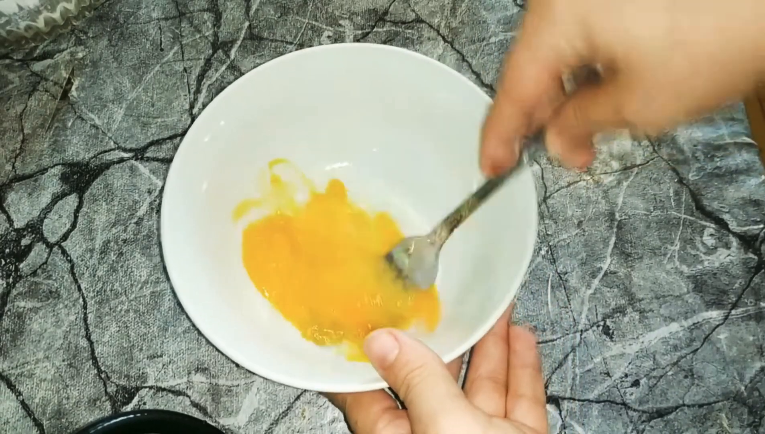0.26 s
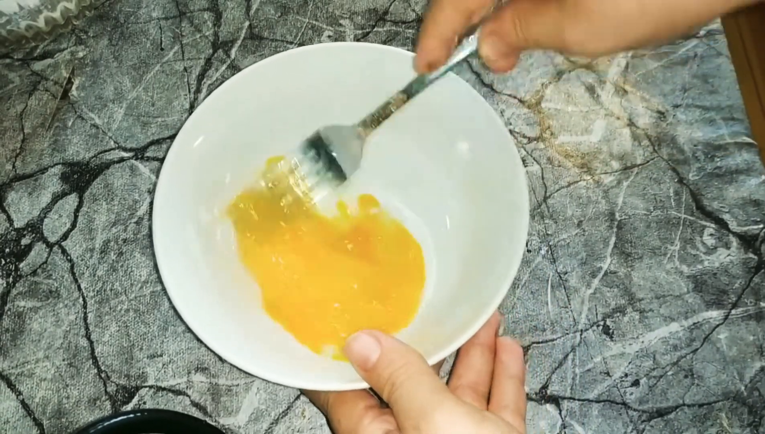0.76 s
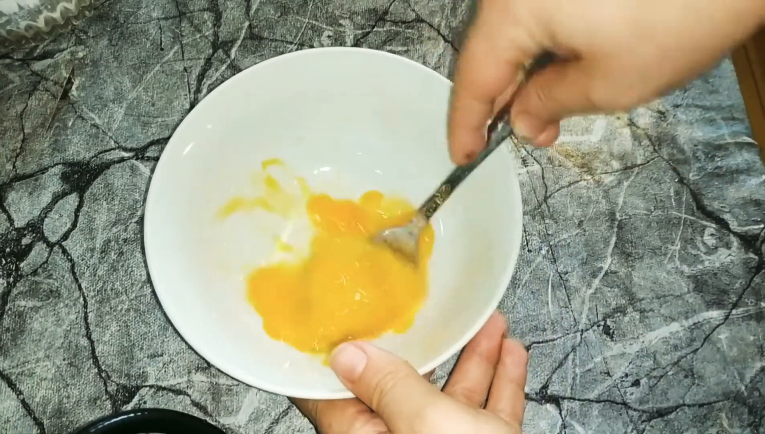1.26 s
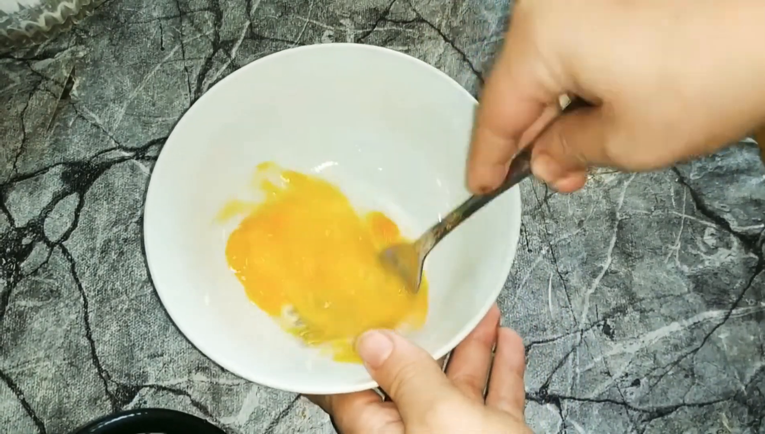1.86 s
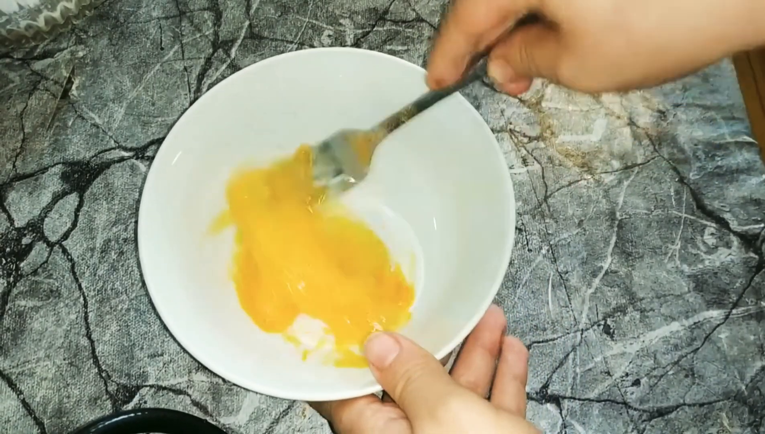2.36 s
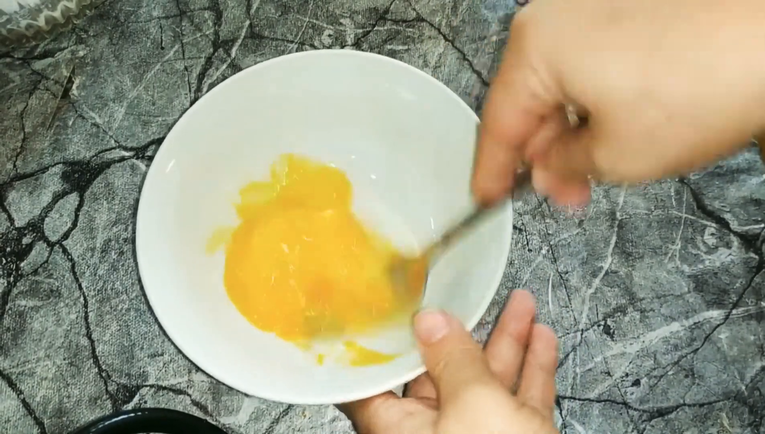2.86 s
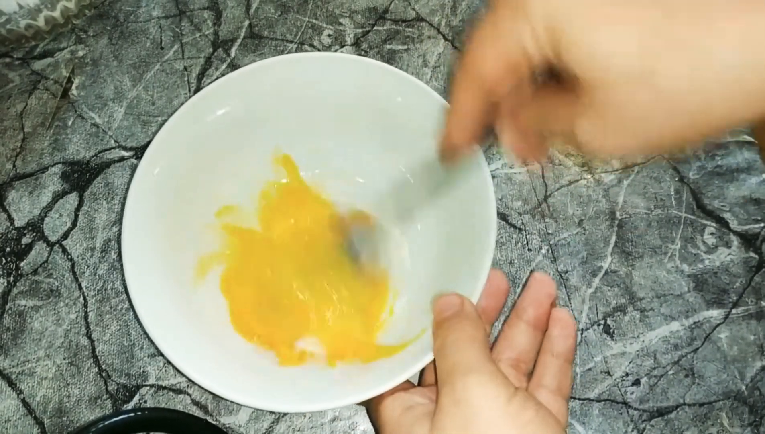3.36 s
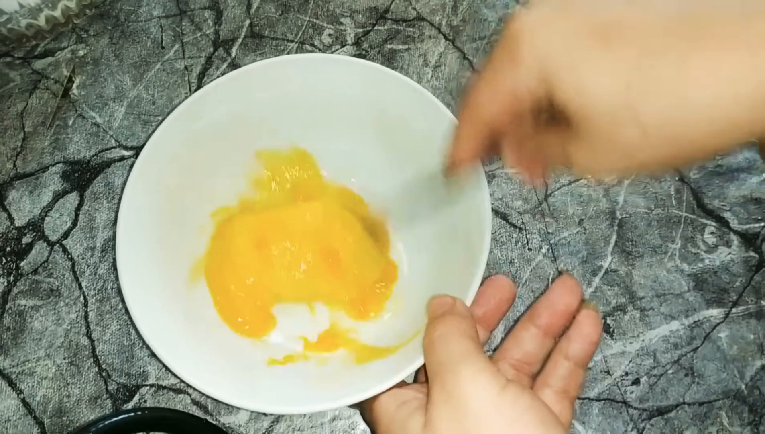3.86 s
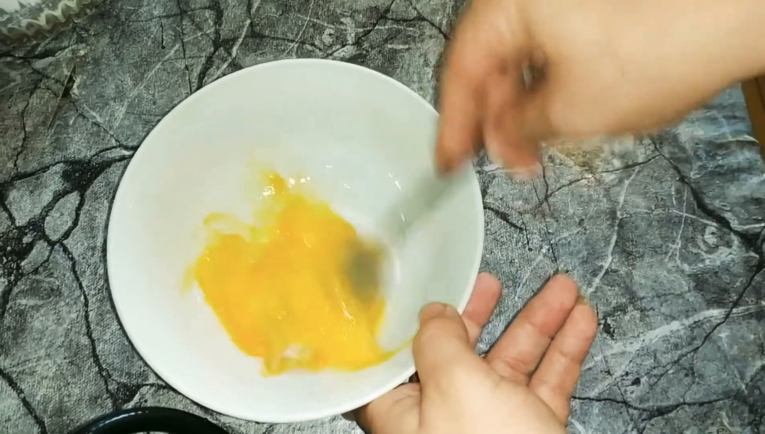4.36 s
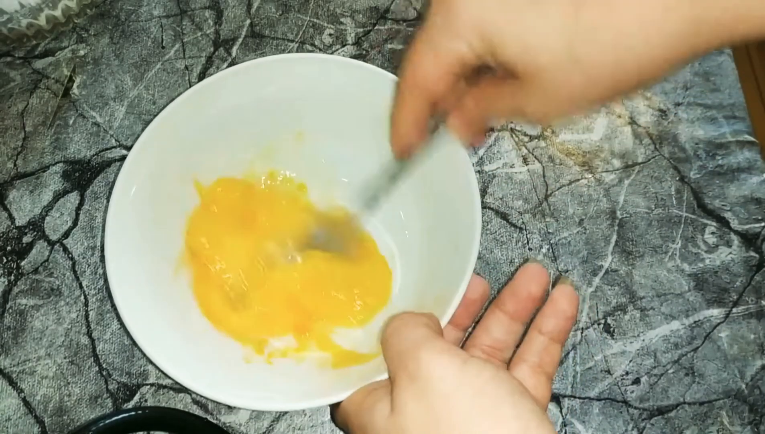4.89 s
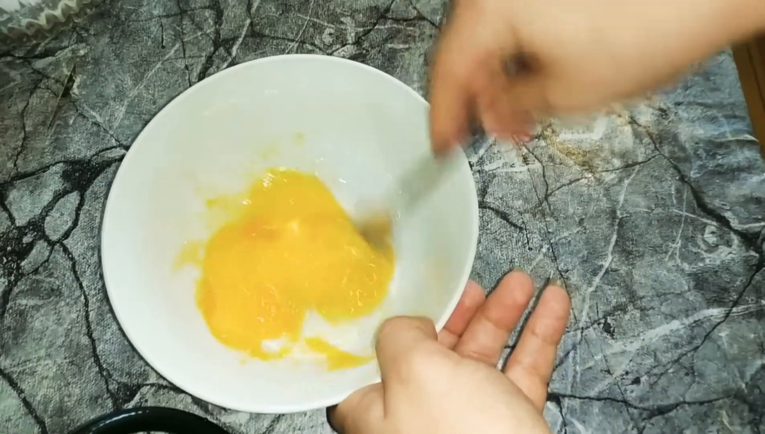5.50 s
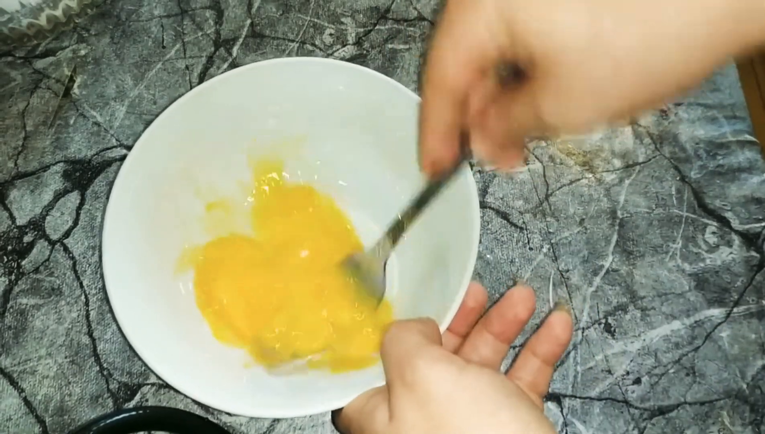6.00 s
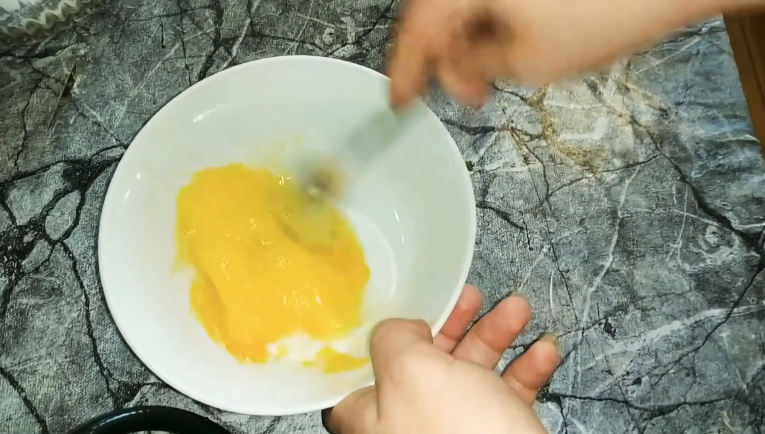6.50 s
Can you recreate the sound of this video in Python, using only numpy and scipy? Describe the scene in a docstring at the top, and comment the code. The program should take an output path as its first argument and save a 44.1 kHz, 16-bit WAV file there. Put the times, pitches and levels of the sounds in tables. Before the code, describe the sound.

Close up in a small hard-walled kitchen, a metal fork beats raw egg in a ceramic bowl at about five strokes a second. Each stroke is a bright rasping click followed by a short, crackling wet swish. Small plops and low glugs fill the gaps. Later strokes press harder, with clearer metallic ringing and dull bumps of the bowl on the counter. Quiet room air sits beneath.

```python
"""Fork tines click on a glazed bowl and drag a wet, crackling swish through raw egg, five strokes a second.
Clicks are shaped noise rasps; the swish is noise driven by random bursts; air plops, glugs and bowl
knocks are pulses in damped resonances. Hard strokes ring the fork's modes and bump the bowl on the counter.
A kitchen echo and quiet air surround it; a close pair of microphones hears most lows in opposite phase."""
import sys
import numpy as np
from scipy import signal
from scipy.fft import rfft, irfft
from scipy.io import wavfile
from scipy.ndimage import uniform_filter1d

SR = 44100
rng = np.random.default_rng(int(sys.argv[2]) if len(sys.argv) > 2 else 0)


def int16_out(signal):
    """Quantize to a 16-bit WAV file."""
    q = np.round(np.clip(np.atleast_2d(signal).T, -1, 1) * 32767)
    wavfile.write(sys.argv[1], SR, q.astype(np.int16))


N = 297234
TIME = np.arange(N) / SR
EDGE_HZ = 16150

# Quiet air, spectral density: [f/Hz, level/dB per Hz]
AIR_COLOUR = [(25, -25), (85, -29), (150, -1), (220, 4), (400, 2.5), (700, -4), (1200, 0), (1900, -5.5),
              (4000, -6.5), (9000, -13.5), (16000, -14.5)]
# Kitchen decay: [f/Hz, t60/s]
KITCHEN_DECAY = [(150, 0.13), (500, 0.21), (1200, 0.49), (4000, 0.23), (9000, 0.15), (16000, 0.016)]
# Stereo difference: [f/Hz, side minus mid/dB]
WIDTH = [(40, 10), (110, -1.5), (250, 13.5), (600, -2.5), (1100, 4), (2200, 1), (4400, 0), (15000, 0.5)]
# Depth of random shifting colour in swish, clicks and echo: [f/Hz, depth/dB]
SHIFT_DEPTH = [(300, 2.5), (2000, 4.5), (6000, 4), (12000, 6)]

# Modes of the bowl on the counter: [f/Hz, level/dB, t60/s]
COUNTER_MODES = [(169, -2, .4), (237, 7, .28), (272, 4, .15), (335, 1, .15), (448, -5, .2), (488, -3, .2),
                 (636, -3, .18)]
# Modes of the bowl's wall: [f/Hz, level/dB, t60/s]
BOWL_MODES = [(1212, -1, 0.32), (2920, -8, 0.13)]
# Resonances of the fork pressed on the bowl: [f/Hz, width/Hz, level/dB]
FORK_MODES = [(1300, 300, -8), (1700, 300, -4), (2280, 200, -5), (3050, 280, -3), (3820, 200, -2),
              (4750, 350, 0), (5450, 350, -1), (5760, 220, 1), (6350, 300, -13), (6950, 350, -7),
              (7920, 260, -3), (8900, 350, -6), (10400, 350, -5), (11200, 400, -11), (13550, 500, -9),
              (14550, 350, -7), (15400, 300, -10)]

# Spectral densities of the noise layers: [f/Hz, level/dB per Hz]
BUMP_COLOUR = [(30, -47), (100, -52), (170, -3), (290, -26), (480, -1.5), (700, -7.5), (1500, -36),
               (4000, -62)]
SLOSH_COLOUR = [(30, -26), (85, -51), (130, -9), (175, 8.5), (250, 16), (330, 2), (430, -7), (700, -44),
                (1500, -21)]
GURGLE_COLOUR = [(300, -15), (750, -4.5), (1020, 4.5), (1300, 2), (1650, 2), (2100, 4), (3500, -3)]
SWISH_COLOUR = [(500, -13), (1200, -23.5), (2200, -26), (2700, -0.5), (3150, 2), (3450, 4), (4300, 5.5),
                (6200, 1.5), (8200, 3.5), (11000, 2), (14000, 4), (16000, -18)]
CLICK_COLOUR = [(60, -71), (200, -7), (700, -16.5), (1200, -8.5), (2200, 2.5), (3800, 5), (4600, 8),
                (5050, 0), (5650, 5.5), (6400, 5.5), (7600, 4), (11000, 2), (16000, -4.5)]

# Event levels are relative: each layer adds its own offset.
# Fork rubs free of the wall and lets it sing: [t/s, level/dB]
SONGS = [(0.479, -45), (0.661, -41), (0.862, -38.5), (1.67, -46.5), (1.801, -54), (1.867, -35.5),
         (2.01, -40), (2.079, -39), (2.227, -41), (2.479, -35.5), (3.859, -44), (4.078, -38.5),
         (4.939, -40), (5.552, -43.5), (5.736, -47), (5.873, -34.5), (6.352, -40)]
# Hardest knocks of the bowl on the counter: [t/s, level/dB, judder decay/s]
BUMPS = [(2.388, -28.5, 0.023), (4.019, -28, 0.05), (4.051, -28.5, 0.043), (4.083, -32, 0.035),
         (4.279, -37, 0.0089), (4.413, -28, 0.083), (4.476, -55, 0.018), (4.9, -35.5, 0.01),
         (5.267, -23, 0.032), (5.306, -26.5, 0.03), (5.662, -32, 0.11), (5.718, -19.5, 0.034),
         (5.753, -37, 0.02), (5.873, -34, 0.023)]
# Mass of egg folds over: [t/s, level/dB, f/Hz]
GLUGS = [(0.189, -35, 300), (0.241, -37, 230), (0.433, -42, 270), (0.608, -50, 260), (1.037, -44, 288),
         (1.201, -46, 270), (1.4, -35, 280), (1.998, -47, 280), (2.043, -31, 230), (2.204, -47, 290),
         (2.609, -33, 288), (3.062, -34, 290), (3.213, -45, 290), (3.263, -37, 240), (3.422, -41, 290),
         (3.458, -47, 280), (3.618, -35, 280), (3.674, -36, 230), (3.836, -32, 280), (3.882, -39, 290),
         (4.238, -38, 280), (4.676, -40, 300), (4.702, -43, 290), (5.092, -37, 280), (5.123, -39, 240),
         (6.14, -39, 290), (6.322, -32, 290), (6.536, -33, 310)]
# Blobs of egg drop back as the fork swings round: [t/s, level/dB, blobs in a row]
GLOOPS = [(0.103, -44.5, 1), (0.17, -44.5, 1), (0.813, -36.5, 1), (1.1, -44, 2), (2.098, -38, 1),
          (2.559, -41.5, 2), (2.698, -44.5, 2), (3.065, -45, 2), (3.339, -41, 2), (3.561, -41, 2),
          (3.979, -42.5, 1), (4.594, -41.5, 3), (5.561, -45.5, 2), (6.062, -43, 2)]
# Egg slaps shut on pockets of air: [t/s, level/dB, f/Hz]
PLOPS = [(0.188, -34, 1200), (0.388, -23, 1060), (0.426, -35, 1130), (0.58, -28.5, 1195),
         (0.602, -35, 1160), (0.626, -26, 1290), (0.682, -26, 1210), (0.736, -31, 1320), (0.784, -25, 1140),
         (0.81, -23.5, 1200), (0.865, -29, 1180), (0.88, -31.0, 1180), (1.002, -38, 1230),
         (1.076, -33, 1310), (1.199, -34, 1330), (1.23, -27.5, 1460), (1.255, -32, 1240), (1.28, -26, 1270),
         (1.384, -34.0, 1180), (1.44, -33.5, 1230), (1.538, -37, 1190), (1.579, -28, 1270),
         (1.604, -32, 1250), (1.784, -27, 1160), (1.833, -28, 1350), (1.995, -37, 1290), (2.012, -37, 1320),
         (2.029, -36, 1200), (2.189, -20, 1140), (2.234, -28, 1110), (2.373, -21.5, 1070),
         (2.438, -31, 1210), (2.598, -16.5, 1040), (2.989, -32, 1240), (3.064, -34, 1270),
         (3.164, -41.5, 1060), (3.21, -44, 1190), (3.26, -34.5, 1260), (3.409, -34.5, 1180),
         (3.451, -38, 1240), (3.468, -29, 1400), (3.568, -35, 1380), (3.609, -26, 1230), (3.653, -39, 1310),
         (3.825, -30, 1040), (3.862, -27.5, 1230), (3.887, -32.5, 1020), (4.012, -17, 1270),
         (4.051, -37, 1450), (4.077, -42, 1360), (4.233, -36, 1390), (4.256, -20.5, 1480),
         (4.413, -17.5, 1060), (4.469, -29, 1040), (4.581, -25, 1090), (4.673, -36, 1110),
         (4.873, -46, 1300), (4.898, -28.5, 1280), (4.937, -25, 1160), (5.071, -35.0, 1160),
         (5.103, -30, 1210), (5.163, -30, 1200), (5.267, -19.5, 1200), (5.659, -23.5, 1400),
         (5.881, -42, 1240), (5.94, -39, 1070), (6.052, -33, 1090), (6.095, -26, 1070),
         (6.112, -33.5, 1280), (6.325, -23.5, 1120), (6.35, -22.5, 1250), (6.499, -16, 1130)]
# Threads of egg snap between strokes: [t/s, level/dB, f/Hz]
SNAPS = [(0.363, -47, 2540), (0.37, -33.5, 2950), (0.732, -39, 2220), (0.999, -47, 2240),
         (1.093, -56, 12750), (1.37, -33.5, 2970), (1.538, -44, 2220), (1.672, -41, 2930),
         (1.933, -51, 3140), (2.968, -46, 2210), (3.163, -40, 2240), (3.566, -44.5, 2240),
         (3.788, -48, 2240), (4.732, -41, 4580), (4.807, -48, 2240), (5.156, -38, 5370), (6.049, -45, 4050),
         (6.387, -46, 3700)]
# Tines skip on the glaze during a drag; the rows at 2240 Hz are wet pops of egg: [t/s, level/dB, clink f/Hz]
SKIPS = [(0.015, -33, 8400), (0.035, -30, 12300), (0.221, -25, 8900), (0.416, -26.5, 9500),
         (0.588, -32, 2370), (0.617, -28.5, 3960), (0.679, -49, 2240), (0.826, -26, 8600),
         (1.226, -32, 2250), (1.623, -30.5, 8700), (1.635, -27.5, 3160), (2.228, -28, 11700),
         (2.421, -26, 4690), (2.435, -32, 8480), (2.623, -35, 8800), (2.797, -27, 4130), (2.841, -34, 4310),
         (2.999, -52, 3320), (3.241, -29.5, 3490), (3.259, -33, 10500), (3.43, -35, 7550),
         (3.451, -24, 7700), (3.653, -27, 6200), (3.669, -26.5, 9600), (3.861, -35, 2240),
         (3.879, -28.5, 3700), (4.232, -24.5, 3490), (4.26, -27.5, 2240), (4.276, -23.5, 10400),
         (4.461, -25, 10900), (4.481, -23.5, 9500), (4.695, -30, 4130), (5.306, -29, 8400),
         (5.506, -31.5, 8600), (5.781, -38, 5700), (5.931, -25, 5140), (5.937, -26.5, 3700),
         (6.127, -25.5, 11600), (6.322, -35, 4100), (6.518, -29, 3960), (6.528, -32, 9500)]
# Strokes (light touch, strike on glaze, drag through egg, lift):
# [strike t/s, click level/dB, dip lead/s, touch level/dB, tine landing spread/s, drag/s,
#  swish level/dB, hollow f/Hz, pressure 0-1, clink f/Hz, clink prominence/dB]
STROKES = [(0.002, -29.5, 0.0013, -27, 0.0027, 0.023, -32.5, 3970, 0.08, 3570, 11.5),
           (0.186, -25.5, 0.006, -53, 0.0054, 0.035, -30.5, 3730, 0, 3060, 0),
           (0.3946, -23.5, 0.016, -47, .003, 0.025, -31, 3610, 0.1, 8100, 5),
           (0.6, -21, 0.023, -44, 0.0052, 0.06, -37, 3100, 0.1, 12700, 11.5),
           (0.8167, -22.5, 0.033, -33, 0.0045, 0.015, -32, 3090, 0, 9000, 11),
           (1.03, -24.5, 0.012, -43, 0.0038, 0.048, -39, 4490, 0.05, 4770, 7),
           (1.196, -24, 0.014, -36, 0.0028, 0.036, -31, 1847, 0.1, 10900, 3),
           (1.392, -23, 0.0064, -22.5, 0.00094, 0.043, -33.5, 2890, 0.15, 6460, 1),
           (1.587, -23, 0.0083, -36, 0.0017, 0.043, -31.5, 3090, 0.14, 8850, 8),
           (1.7887, -22, 0.0062, -27.5, 0.0022, 0.055, -35, 2600, 0.05, 12600, -6),
           (1.993, -25.5, 0.0044, -32, 0.0037, 0.036, -31.5, 4600, 0.26, 5540, 10),
           (2.2021, -30.5, 0.017, -29.5, 0.0022, 0.017, -32.5, 4530, 0, 10940, -11),
           (2.382, -23, 0.0091, -27.5, 0.0041, 0.068, -33, 2890, 0.36, 10000, 4),
           (2.6019, -21, 0.005, -25.5, 0.0029, 0.052, -30.5, 3200, 0.22, 5560, -2),
           (2.789, -25, 0.017, -41, 0.0037, 0.056, -34.5, 4180, 0.06, 3950, 11),
           (2.986, -46, 0.003, -42, .003, 0.078, -38.5, 4760, 0.56, 2240, 3),
           (3.209, -23.5, 0.013, -42, 0.002, 0.043, -33, 4330, 0.06, 5260, 15),
           (3.4177, -24, 0.0082, -29.5, 0.003, 0.051, -34, 4070, 0.22, 5600, 3),
           (3.61, -20.5, 0.0044, -29, 0.0016, 0.051, -31, 3630, 0, 5500, 2),
           (3.8302, -26.5, 0.0052, -24.5, 0.0019, 0.039, -31, 3500, 0.14, 10200, 2),
           (4.0102, -21.5, 0.004, -42, 0.0034, 0.069, -37, 3600, 1, 2240, 3),
           (4.2159, -26, 0.0019, -34, 0.0028, 0.051, -30.5, 4690, 0.15, 4940, 14.5),
           (4.4175, -23.5, 0.0085, -39, 0.0056, 0.045, -32, 3790, 0.85, 6200, -10),
           (4.6708, -26.5, 0.01, -46, 0.0057, 0.021, -33, 3720, 0.31, 3960, 3),
           (4.895, -19.5, 0.028, -48, 0.0027, 0.037, -36.5, 1973, 0.2, 8400, 13.5),
           (5.0862, -24, 0.017, -56, 0.0017, 0.013, -35.5, 2000, 0.59, 10650, 8),
           (5.268, -21, 0.0021, -23, 0.0045, 0.029, -33.5, 3500, 0.9, 4140, 5),
           (5.4678, -23, 0.0025, -55, 0.0011, 0.041, -33.5, 3670, 0.36, 6700, 9),
           (5.66, -18.5, 0.003, -31, 0.0029, 0.11, -40.5, 3440, 1, 8100, 6),
           (5.868, -22, 0.004, -44, 0.0046, 0.044, -33, 3660, 0.85, 5150, 9),
           (6.1047, -26.5, 0.011, -25, 0.003, 0.013, -29, 4820, 0, 10800, -12),
           (6.3048, -24.5, 0.024, -53, 0.0035, 0.017, -32, 2850, 0.49, 7500, 14),
           (6.5003, -26, 0.019, -39, 0.0055, 0.011, -28, 4420, 0.56, 2970, 14)]


def amp(db):
    """Decibels to gain."""
    return 10 ** (np.asarray(db) / 20)


def unit(x):
    """Scales to rms 1."""
    return x / np.sqrt(np.mean(x ** 2) + 1e-20)


def read(points, hz):
    """Reads a table on a log-frequency axis."""
    f, value = np.transpose(points)
    return np.interp(np.log(hz + 1), np.log(f), value)


def add(mix, s, sound):
    """Adds a two-channel sound at time s, trimmed to the mix."""
    at = round(s * SR)
    sound = sound[:, max(-at, 0):]
    part = mix[:, max(at, 0):][:, :sound.shape[1]]
    part += sound[:, :part.shape[1]]


def spread(pair, colour, bright_db=0):
    """Colours two signals and plays them as mid and side; returns left and right."""
    size = pair.shape[1]
    hz = np.fft.rfftfreq(size, 1 / SR)
    tilt = read([(4000, -.5), (11000, .5)], hz)
    mid, side = rfft(pair) * amp(read(colour, hz) + bright_db * tilt)
    width = amp(read(WIDTH, hz))
    left_right = np.array([mid + width * side, mid - width * side]) / np.hypot(1, width)
    return irfft(left_right, size)


def ring(modes, side_db, detune=0, count=1, rise_s=0.0013):
    """One blow on decaying modes, each split into close tones with their own stereo phase."""
    t = np.arange(SR * 2 // 3) / SR
    out = np.zeros((2, len(t)))
    for hz, db, t60_s in modes:
        tones_hz = hz * (1 + detune * rng.standard_normal((count, 1)))
        tones = np.exp(2j * np.pi * (tones_hz * t + rng.random((count, 1))))
        wave = tones.sum(0) * amp(db - 60 * t / t60_s) / np.sqrt(count)
        out += wave.real + amp(side_db) * wave.imag * np.array([[1], [-1]])
    return out / np.hypot(1, amp(side_db)) * (1 - np.exp(-(t / rise_s) ** 2))


def plop(db, hz, width_hz, low_cut_hz, slur_db, slur_s, side_db, linger_db=-13):
    """A pulse and decaying noise in a heavily damped resonance; returns its (negative) start time and sound."""
    t = np.arange(-1024, 5120) / SR
    f = np.fft.rfftfreq(len(t), 1 / SR) + 1
    decay = np.exp(-abs(t) / slur_s) + amp(linger_db) * np.exp(-abs(t) / (4 * slur_s))
    dying = (t > 0) * decay
    slur = amp(slur_db) * dying / np.linalg.norm(dying) * rng.standard_normal((2, len(t)))
    drive = slur + (t == 0)
    colour = (1 + 1j * (f - hz) / width_hz) ** -2 / np.hypot(1, (low_cut_hz / f) ** 8)
    phase = np.exp(2j * np.pi * rng.random())
    mid_side_gain = np.array([[1], [1j * amp(side_db)]])
    mid, side = irfft(rfft(drive) * colour * phase * mid_side_gain, len(t))
    loudest = uniform_filter1d(mid ** 2 + side ** 2, size=256).max()
    return t[0], amp(db) * np.array([mid + side, mid - side]) / np.sqrt(loudest)


def tick(bright_db, ring_hz, ring_db, fall_s, stagger_s=0.0017, tick_db=9, ring_width_hz=900):
    """Four staggered ticks in a brief rasp with one resonance; returns its (negative) start time and sound."""
    rise_s, tick_s = .0012, .0004
    t = np.arange(-512, 1024) / SR
    landings = (np.arange(4)[:, None] + rng.random((4, 1))) / 4 - .5
    slide = np.exp(np.where(t < 0, t / rise_s, -t / fall_s))
    ticks = np.exp(-abs(t - stagger_s * landings) / tick_s).max(0)
    noise = (slide + amp(tick_db) * ticks) * rng.standard_normal((2, len(t)))
    rasp = spread(noise, CLICK_COLOUR, bright_db)
    hz = np.fft.rfftfreq(len(t), 1 / SR)
    resonance = 1 + (amp(ring_db) - 1) / (1 + 2j * (hz - ring_hz) / ring_width_hz)
    rasp = irfft(rfft(rasp) * resonance, len(t))
    rasp /= np.sqrt(np.mean(rasp[:, abs(t) < .002] ** 2))
    return t[0], 3 * np.tanh(rasp / 3)  # soft peak limit


def shimmer(t60_s):
    """Fork ring: dense clusters of modes, in new proportions per blow, shifted slightly by the grip."""
    uneven_db, shift = 2, .004
    t = np.arange(2 ** 14) / SR
    lines = np.zeros((2, len(t) // 2 + 1), complex)
    for (centre_hz, width_hz, db), (size, grip) in zip(FORK_MODES, rng.standard_normal((len(FORK_MODES), 2))):
        offset = rng.random(size=20) - rng.random(size=20)
        hz = centre_hz * (1 + shift * grip) + width_hz * offset
        at = np.clip(np.round(hz * len(t) / SR).astype(int), 0, len(t) // 2)
        phases = np.exp(2j * np.pi * rng.random((2, len(at))))
        lines[:, at] += amp(db + uneven_db * size) * phases
    return unit(irfft(lines, len(t))) * amp(-60 * t / t60_s) * (1 - np.exp(-t / 0.0004))


def crackle(per_s, spread_db, wash, grain_s=0.007):
    """Bursting films of egg: random decaying noise puffs over a smooth wash; spread_db sets unevenness."""
    level_db = spread_db * np.minimum(rng.exponential(1, N), 3)
    bursts = amp(level_db) * (rng.random(N) < per_s / SR)
    power = signal.lfilter([1], [1, -np.exp(-1 / (grain_s * SR))], bursts ** 2)
    return unit(np.sqrt(power / power.mean() + wash ** 2) * rng.standard_normal((2, N)))


def clumps(depth_db):
    """Ropes and gaps of egg at the tines: a gain gliding between random levels every 14 ms."""
    clump_s = .014
    times = np.arange(0, N / SR + clump_s, clump_s)
    return unit(amp(depth_db * np.interp(TIME, times, rng.uniform(-1, 1, len(times)))))


def drag(level_db, press_db, rise_s, dip_db, fall_db_per_s, lag_s, swell_db, surge_s=0.0086):
    """Flow round the fork: approach, dip, quick change at the strike, ramp to the lift, draining."""
    power = np.zeros(N)
    for strike, _, dip, _, _, length, swish_db, _, press, *_ in STROKES:
        turns = np.array([-dip - rise_s, -dip, -min(surge_s, dip / 2), 0, length, length + .5])
        times = strike + lag_s + turns
        levels = [-53, dip_db, dip_db, -swell_db, swell_db, swell_db - fall_db_per_s / 2]
        db = np.interp(TIME, times, levels, left=-200, right=-200)
        live = db > -120
        power[live] += amp(db[live] + swish_db + level_db + press_db * press) ** 2
    return np.sqrt(power)


def air():
    """Steady room air: coloured stereo noise."""
    return amp(-48.5) * unit(spread(rng.standard_normal((2, N)), AIR_COLOUR))


def kitchen(x):
    """Dense reflections from hard walls: a noise tail with a decay time per band."""
    t = np.arange(SR * 3 // 4) / SR
    hz, when, z = signal.stft(rng.standard_normal((2, len(t))), SR, nperseg=256)
    decay = amp(-60 * when / read(KITCHEN_DECAY, hz)[:, None])
    tail = signal.istft(z * decay, SR, nperseg=256)[1][:, :len(t)]
    tail *= 1 - np.exp(-t / 0.00067)
    tail /= np.linalg.norm(tail, axis=1, keepdims=True)
    mid_side = np.array([x[0] + x[1], x[0] - x[1]]) / 2
    mid, side = signal.fftconvolve(mid_side, tail, axes=1)[:, :N]
    return np.array([mid + side, mid - side])


def shifting_colour(x):
    """Random time-frequency patches come and go, giving the sound an uneven, shifting colour."""
    hz, _, z = signal.stft(x, SR, nperseg=512, noverlap=384)
    patches = rng.standard_normal(z.shape[1:])
    for _ in range(2):
        patches = uniform_filter1d(patches, size=4, axis=0)
        patches = uniform_filter1d(patches, size=16, axis=1)
    gain = amp(np.clip(unit(patches), -3, 1.7) * read(SHIFT_DEPTH, hz)[:, None])
    gain /= np.sqrt(np.mean(gain ** 2, axis=1, keepdims=True))
    return signal.istft(z * gain, SR, nperseg=512, noverlap=384)[1][:, :N]


def bowl(level_db=7.5, swell_s=0.021, lead_s=0.012, stroke_db=-24):
    """Ceramic wall modes: faint at each strike, a short beating song when the fork rubs free."""
    out = np.zeros((2, N))
    strikes = [(strike, db + stroke_db) for strike, db, *_ in STROKES]
    for s, db in SONGS + strikes:
        song = ring(BOWL_MODES, side_db=-5, detune=.011, count=8)
        swell = 1 - np.exp(-(TIME[:song.shape[1]] / swell_s) ** 2)
        add(out, s - lead_s, amp(db + level_db) * swell * song)
    return out


def bumps(knock_db=2, knock_hz=340, knock_width_hz=200, nudge_db=-25, nudge_lag_s=0.0046, nudge_s=0.032):
    """Bowl foot on counter: damped knock, decaying noise judder, modal boom; strikes nudge it faintly."""
    judder_db, boom_db = -12.5, -8.5
    out = np.zeros((2, N))
    t = np.arange(-SR // 100, SR // 5) / SR
    nudges = [(strike + nudge_lag_s, db + nudge_db, nudge_s) for strike, db, *_ in STROKES]
    for s, db, decay_s in BUMPS + nudges:
        lead_s, knock = plop(db + knock_db, knock_hz, knock_width_hz, low_cut_hz=142,
                             slur_db=4, slur_s=0.016, side_db=13)
        shape = np.exp(np.where(t < 0, t / 0.0024, -t / decay_s))
        judder = unit(spread(rng.standard_normal((2, len(t))), BUMP_COLOUR)) * shape
        add(out, s + lead_s, knock)
        add(out, s + t[0], amp(db + judder_db) * judder)
        add(out, s, amp(db + boom_db) * ring(COUNTER_MODES, side_db=11, detune=.015))
    return out


def glugs(level_db=0, width_hz=130, early_s=0.00388):
    """Folding egg: a few low cycles of a damped resonance."""
    out = np.zeros((2, N))
    for s, db, hz in GLUGS:
        lead_s, sound = plop(db + level_db, hz, width_hz, low_cut_hz=175,
                             slur_db=-2, slur_s=.012, side_db=17.5)
        add(out, s + lead_s - early_s, sound)
    return out


def gloops(level_db=5, gap_s=.028):
    """Falling blobs: a few cycles sweeping steeply into the bass, scaled by random blob size."""
    top_hz, end_hz = 1400, 150  # before scaling by size
    sink_s, swell_s = .0033, .0055
    out = np.zeros((2, N))
    t = np.arange(SR // 20) / SR
    shape = (t / swell_s * np.exp(1 - t / swell_s)) ** 3
    for s, db, blobs in GLOOPS:
        for k, (size, speed, phase) in enumerate(rng.random((round(blobs), 3))):
            sweep = np.exp(-t / sink_s * 2 ** (speed - .5))
            hz = (end_hz + (top_hz - end_hz) * sweep) * 2 ** ((size - .5) / 2)
            turns = np.cumsum(hz) / SR + phase + np.array([[0], [1 / 4]])  # channels in quadrature
            add(out, s + k * gap_s - swell_s, amp(db + level_db) * shape * np.sin(2 * np.pi * turns))
    return out


def plops(level_db=-1, slur_db=2, early_s=0.001986):
    """Air pockets: short wet slaps, too damped by the thick egg to ring."""
    out = np.zeros((2, N))
    for s, db, hz in PLOPS:
        lead_s, sound = plop(db + level_db, hz, width_hz=330, low_cut_hz=800,
                             slur_db=slur_db, slur_s=.007, side_db=12)
        add(out, s + lead_s - early_s, sound)
    return out


def snaps(level_db=0, bright_db=-4, ring_db=6):
    """Threads of egg stretch and snap: short resonant rasps between strokes."""
    out = np.zeros((2, N))
    for s, db, hz in SNAPS:
        lead_s, rasp = tick(bright_db, hz, ring_db, fall_s=.0025)
        add(out, s + lead_s, amp(db + level_db + 6.0) * rasp)
    return out


def squelches(width_hz=550, fall_per_s=1.38, rise_s=0.0026, drain_s=0.0083, level_db=-1, press_db=-10,
              usual_drag_s=0.027):
    """Hollow opening at the lift: sinking narrow-band noise, louder after a long, light drag."""
    out = np.zeros((2, N))
    t = np.arange(-SR // 25, SR // 10) / SR
    shape = np.exp(np.where(t < 0, t / rise_s, -t / drain_s))
    smooth = signal.butter(2, width_hz / 2, fs=SR)
    for strike, _, _, _, _, length, swish_db, hz, press, *_ in STROKES:
        noise = rng.standard_normal((2, len(t))) + 1j * rng.standard_normal((2, len(t)))
        flutter = signal.lfilter(*smooth, noise)
        turns = np.cumsum(hz * np.exp(-fall_per_s * t)) / SR
        band = unit((flutter * np.exp(2j * np.pi * turns)).real)
        gain = amp(swish_db + level_db + press_db * press) * length / usual_drag_s
        add(out, strike + length + t[0], gain * shape * band)
    return out


def egg():
    """Liquid motion: fine spray, small bubbles, slosh of the mass; pressure stirs the deeper two."""
    spray = unit(spread(crackle(per_s=480, spread_db=0.0, wash=0.13), SWISH_COLOUR))
    gurgle = unit(spread(crackle(per_s=210, spread_db=2.0, wash=0.14), GURGLE_COLOUR))
    slosh = unit(spread(crackle(per_s=140, spread_db=16.0, wash=0.55), SLOSH_COLOUR))
    spray = spray * clumps(depth_db=4)
    gurgle = gurgle * clumps(depth_db=6)
    spray_flow = drag(level_db=1.5, press_db=-4.5, rise_s=0.017, dip_db=-15,
                      fall_db_per_s=346, lag_s=0, swell_db=1.0)
    gurgle_flow = drag(level_db=-9.0, press_db=9.0, rise_s=0.037, dip_db=8,
                       fall_db_per_s=162, lag_s=0.00053, swell_db=3.6)
    slosh_flow = drag(level_db=-19.5, press_db=10, rise_s=0.066, dip_db=6.5,
                      fall_db_per_s=165, lag_s=0.013, swell_db=7.5)
    return spray * spray_flow + gurgle * gurgle_flow + slosh * slosh_flow


def scrape(tick_db=-8):
    """Tines catch and slip on glaze: uneven tick runs ring the fork, louder when pressed harder."""
    slips_per_s, spread_db = 420, 3.5
    sizes = amp(spread_db * np.minimum(rng.exponential(1, N), 3))
    slips = sizes * (rng.random(N) < slips_per_s / SR) * rng.choice([-1, 1], N)
    ringing = unit(signal.oaconvolve(slips[None], shimmer(t60_s=.09), axes=1)[:, :N])
    ticking = unit(spread(slips * rng.uniform(-1.08, 1, (2, N)), CLICK_COLOUR))
    ring_flow = drag(level_db=-17, press_db=22, rise_s=.004, dip_db=-30,
                     fall_db_per_s=170, lag_s=0, swell_db=-1)
    tick_flow = drag(level_db=tick_db, press_db=7, rise_s=.015, dip_db=-12,
                     fall_db_per_s=337, lag_s=0, swell_db=-4.5)
    return ringing * ring_flow + ticking * tick_flow


def tines(bright_db=8, press_dull_db=10, touch_bright_db=0, skip_bright_db=3, skip_ring_db=6, skip_db=5,
          ping_db=-17, skip_ping_db=-14):
    """Touch, strike and skip rasps; strikes and skips ping, and hard strikes are duller and ring the fork."""
    ring_db, press_ring_db, ring_t60_s = -29, 23, .45
    out = np.zeros((2, N))
    for strike, db, dip, touch_db, landing_s, *_, press, clink_hz, clink_db in STROKES:
        touch = (strike - dip, touch_db, touch_bright_db)
        hit = (strike, db, bright_db - press_dull_db * press)
        for s, level_db, colour_db in [touch, hit]:
            lead_s, rasp = tick(colour_db, clink_hz, clink_db, fall_s=.004, stagger_s=landing_s)
            add(out, s + lead_s, amp(level_db + 6.5) * rasp)
        add(out, strike, amp(db + ping_db) * shimmer(t60_s=0.14))
        add(out, strike, amp(db + ring_db + press_ring_db * min(press, 1)) * shimmer(ring_t60_s))
    for s, db, hz in SKIPS:
        lead_s, rasp = tick(skip_bright_db, hz, skip_ring_db, fall_s=.0025)
        add(out, s + lead_s, amp(db + skip_db) * rasp)
        add(out, s, amp(db + skip_ping_db) * shimmer(t60_s=0.068))
    return out


def scene():
    """Egg, fork and bowl close by, with the kitchen's echo and quiet air."""
    thuds = bumps()
    pops = glugs() + gloops() + plops()
    wet = squelches() + snaps() + egg()
    clicks = tines()
    echo = kitchen(amp(-9.0) * wet + amp(-10.5) * thuds + amp(-17) * pops)
    coloured = shifting_colour(wet + clicks + echo)
    return air() + bowl() + thuds + pops + scrape() + coloured


def record(dry):
    """Recorder's band limit: a linear-phase low-pass at EDGE_HZ."""
    low_pass = signal.firwin(255, EDGE_HZ, window=("kaiser", 8), fs=SR)
    return signal.oaconvolve(dry, low_pass[None], "same", axes=1)


dry = scene()
out = record(dry)
int16_out(out)
```